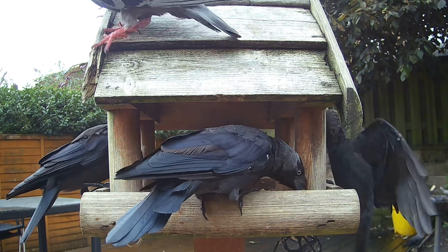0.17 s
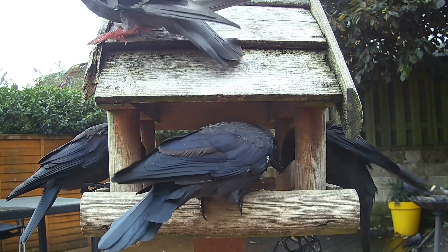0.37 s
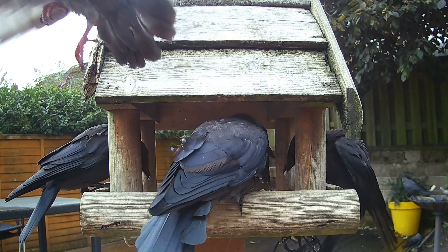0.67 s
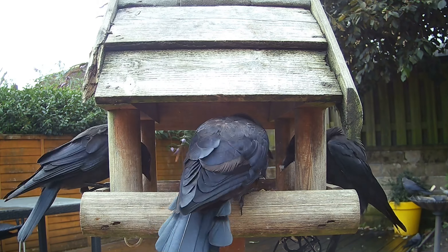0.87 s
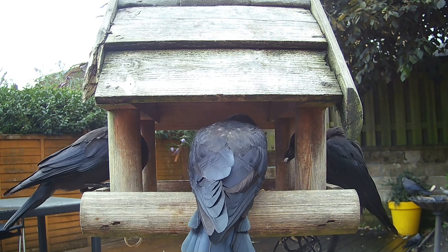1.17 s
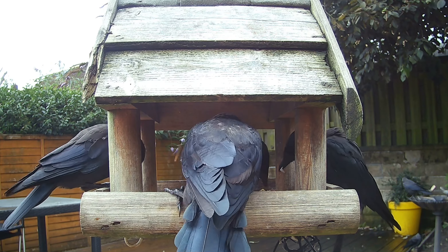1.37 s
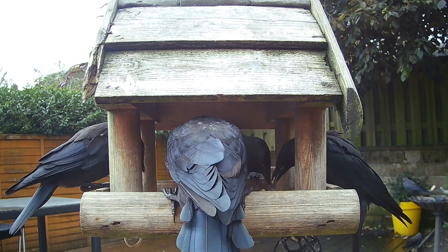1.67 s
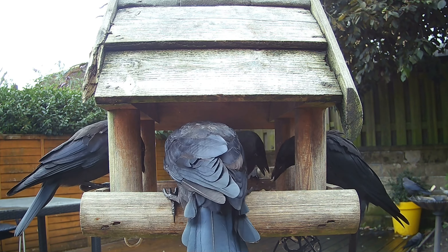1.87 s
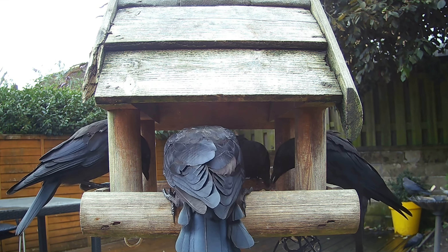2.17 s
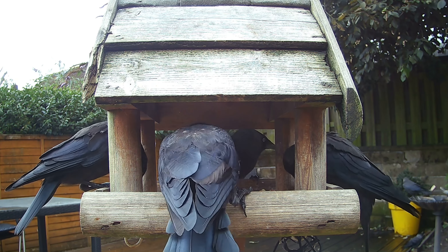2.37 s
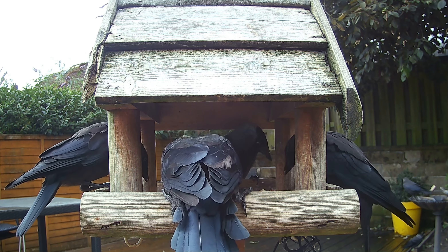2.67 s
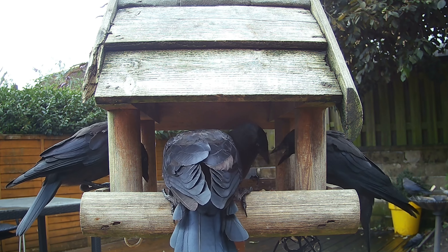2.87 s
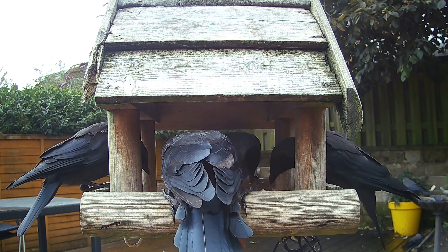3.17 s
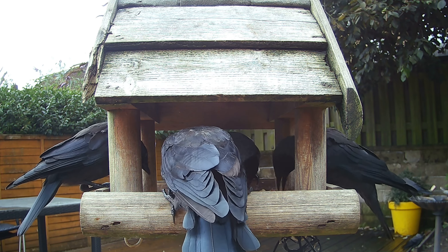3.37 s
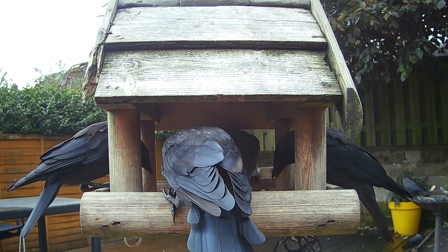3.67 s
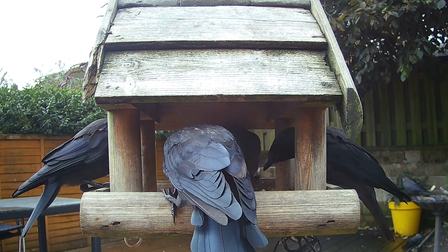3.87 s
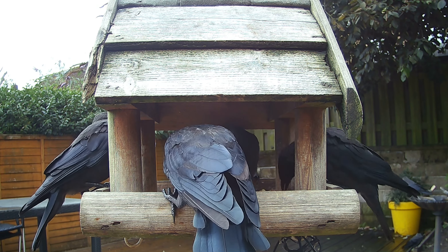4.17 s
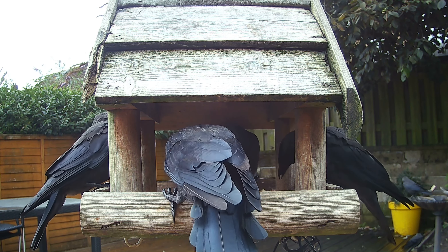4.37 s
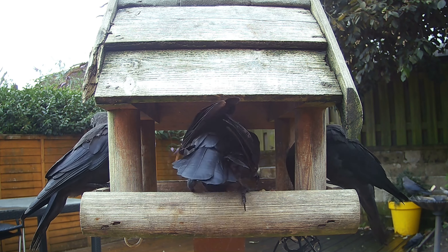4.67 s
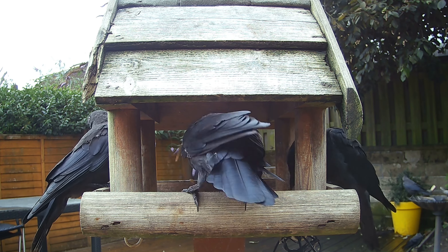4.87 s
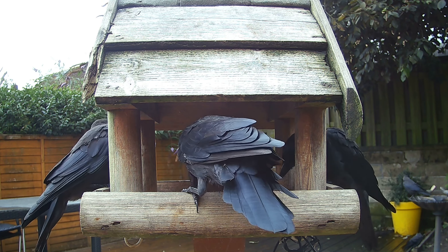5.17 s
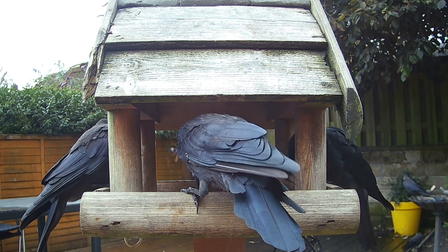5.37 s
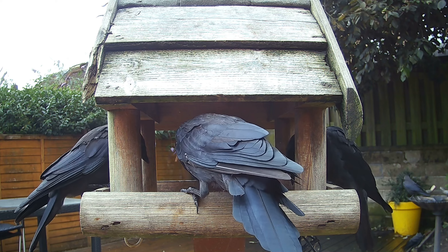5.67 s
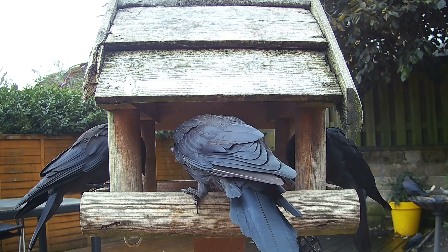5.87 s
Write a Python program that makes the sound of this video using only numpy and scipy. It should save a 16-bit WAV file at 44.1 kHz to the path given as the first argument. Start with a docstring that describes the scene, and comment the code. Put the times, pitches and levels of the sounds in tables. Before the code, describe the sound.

Several jackdaws feed at a wooden bird table in a fenced garden. First, claws and beaks tick on the wood and a brief flurry of wingbeats swishes and thuds, pushing air at the close microphone. Then comes a quick, uneven run of short, sharp calls, each falling in pitch, many of them hoarse, ringing slightly off the fences. Faint feather rustle, distant traffic and a low rumble lie underneath.

```python
"""Jackdaws give a quick run of short calls at a wooden bird table in a fenced garden.
Each call is a stack of tones from the bird's voice box, shaped by its throat: a clear note
that falls, turns hoarse and rings off the fences. Mostly before the calls, wings swish, thud
and push air, while claws and beaks tick on the wood. Behind it all, feathers rustle and
distant traffic drones over a low rumble."""
import sys
import numpy as np
from scipy import signal
from scipy.io import wavfile
from scipy.ndimage import uniform_filter1d

SR = 44100
rng = np.random.default_rng(int(sys.argv[2]) if len(sys.argv) > 2 else 0)


def unload_audio(sound):
    """Save the sound as a 16-bit wav file, at the path given as the first command line argument."""
    columns = np.transpose(np.atleast_2d(sound))
    # keep every value between -1 and 1, then stretch to whole-number steps
    steps = np.round(np.clip(columns, -1, 1) * 32767)
    wavfile.write(sys.argv[1], SR, steps.astype(np.int16))


N = 264688

# How loud the background is. Each row: time in seconds, then traffic, rumble and rustle levels in dB.
BACKGROUND_LEVELS = [(0, -46.5, -42.5, -80), (.5, -47, -43.5, -56), (1.2, -42, -38, -54),
                     (1.7, -42.5, -38.5, -54.5), (2.3, -41, -43, -54.5), (2.9, -36, -38.5, -57.5),
                     (4, -38.5, -37.5, -62), (5.001, -37, -36.5, -60), (5.5, -45.5, -42, -83),
                     (6, -55, -49.5, -58.5)]
# The tone colours of four noises. Each row: frequency in Hz, relative strength there in dB.
TRAFFIC_COLOUR = [(88, -6), (150, -1), (380, -3), (1240, -4.5), (2480, -19), (5260, -22), (10200, -34.5),
                  (15500, -67)]
RUMBLE_COLOUR = [(12, -33), (20, -12.5), (48, 3.5), (70, -7.5), (97, -0.5), (146, -10.5), (220, -10),
                 (440, -43.5)]
RUSTLE_COLOUR = [(1200, -20), (2200, -7), (6000, -9.5), (9300, -13), (15500, -29)]
SWISH_COLOUR = [(600, 7.5), (1000, 2), (4300, 8), (8500, -0.5), (15000, -31)]
# How long the fences ring. Each row: frequency in Hz, seconds to fade by 60 dB.
FENCE_FADES = [(1000, 0.41), (2200, 0.35), (5000, 0.47), (10000, 0.44)]
# Echoes from close by. Each row: delay in seconds, level in dB against the direct sound.
CLOSE_ECHOES = [(.0043, -16.5), (0.0104, -11.5), (.031, -17)]
# Air pushed at the microphone by wings. Each row: start in seconds, level in dB, frequency in Hz.
WING_GUSTS = [(0.637, -23, 25), (0.791, -26.5, 22), (.895, -25.5, 24.4), (1.0, -24, 24), (1.226, -25, 37.5),
              (5.435, -29, 44.2), (5.543, -30, 39), (5.943, -29, 39.5)]
# Claws and beaks on wood. Each row: start in seconds, level in dB, pitch in Hz.
WOOD_TICKS = [(.1077, -26, 4730), (.2595, -39, 6640), (.268, -37, 2900), (.3924, -39, 2600),
              (.4374, -33, 1400), (.5182, -41.5, 3220), (1.062, -26, 4940), (1.198, -28, 3900),
              (1.7, -33, 6600), (1.7544, -36.5, 6190), (2.0203, -29, 5430), (2.1558, -31, 6000),
              (2.1954, -31.5, 2760), (2.293, -35, 7400), (3.397, -26, 7160), (3.972, -38, 5870),
              (5.0434, -30, 6400)]
# Wing beats. Each row: time in seconds, swish level in dB, thud level in dB, thud pitch in Hz.
WING_BEATS = [(0.089, -41.5, -59, 520), (0.804, -46.5, -40, 517), (0.8708, -41.5, -34.5, 546),
              (0.924, -46, -34, 327), (0.995, -31.5, -31.5, 580), (1.052, -38, -38.5, 746),
              (1.129, -39.5, -37.5, 395), (1.1966, -58, -38, 444), (1.2526, -37, -30, 348),
              (1.314, -40, -38.5, 520), (1.3647, -35.5, -32.5, 285), (1.414, -38.5, -42, 520),
              (1.4799, -40, -32, 294), (1.6117, -40, -51, 520), (2.1286, -43.5, -44, 520),
              (3.855, -31, -61, 520)]
# The throat's main, high and top resonances (frequencies it favours). Each row: centre in Hz for
# a 1130 Hz note, width in Hz, level in dB, share of the call's brightness added to that level.
THROAT_RESONANCES = [(2265, 710, 3, 0.098), (5020, 1660, -9.5, 0.56), (8010, 3640, -21.5, 0.4)]
# The calls. Each row: start, hold time and fall time in seconds, start and end pitch in Hz, level in dB,
# hoarseness from 0 to 1, brightness in dB, boosts of the low and the third resonance in dB.
JACKDAW_CALLS = [ (2.484, 0.03, 0.052, 1109, 852, -24, 0.4, 1, 3, -2),
                 (2.595, 0.011, 0.024, 1070, 906, -29.5, 0.75, -16, 10.5, 6),
                 (2.757, 0.02, 0.051, 1150, 844.5, -17, 0.79, 2.5, 0, -11),
                 (2.797, 0.014, 0.035, 1226, 1118, -20.5, 0.65, 16.5, 13.5, 19),
                 (2.942, 0.032, 0.071, 1270, 813, -16, 0.68, 20.5, 12, 19.5),
                 (3.030, 0.019, 0.025, 1253, 1013, -15, 1, -4.5, -7, 0),
                 (3.197, 0.019, 0.091, 937, 899, -19.5, 0.69, 9.5, 6.5, 17),
                 (3.218, 0.023, 0.064, 1128, 981, -20, 0.64, -7, -6, 1),
                 (3.349, 0.043, 0.023, 1076, 929, -26.5, 0.23, -11, 11.5, -5),
                 (3.422, 0.0061, 0.012, 1006, 980, -29.5, 0.24, -27, -6, -15),
                 (3.490, 0.029, 0.043, 1266, 943, -11.5, 0.52, -2, -10, -11),
                 (3.694, 0.013, 0.048, 1214, 982, -25, 0.37, -9, 4.5, -22),
                 (3.780, 0.034, 0.05, 1174, 1001, -29, 0.51, -8, 5.5, -17),
                 (4.005, 0.03, 0.042, 1158, 1008, -15.5, 0.57, -7, -3, -26),
                 (4.151, 0.012, 0.051, 1280, 881, -18, 0.63, -21.5, -5.5, -17),
                 (4.27, 0.017, 0.049, 1139, 855, -18.5, 0.62, -1, 6.5, 1),
                 (4.304, 0.022, 0.053, 1367, 1105, -19.5, 1, 4, -3.5, 14),
                 (4.384, 0.021, 0.0246, 1174, 1020, -18.5, 0.086, -23, -3, -6),
                 (4.497, 0.026, 0.049, 1280, 815, -19, 0.7, 13.5, 15, 18),
                 (4.564, 0.014, 0.044, 1086, 781, -22, 0.91, 13, -7, 19),
                 (4.628, 0.022, 0.043, 1080, 1065, -14, 0.86, 14, 2.5, 29),
                 (4.734, 0.02, 0.034, 954, 806, -15.5, 0.95, -16, -11, -29),
                 (4.750, 0.032, 0.0436, 1139, 974, -19, 0.67, -14, 0.5, -10),
                 (5.064, 0.022, 0.042, 1321, 1045, -15.5, 0.4, -9.5, -5, 2),
                 (5.169, 0.015, 0.044, 1188, 980, -24, 0.34, -7, 2.5, 3),
                 (5.224, 0.035, 0.03, 1179, 879, -14, 0.34, -6.5, -7, -1), ]

# Two narrow throat resonances, below and above the main one, whose strength differs from call to call.
LOW_HZ, LOW_WIDTH_HZ, LOW_DB = 1257, 312, -7.5
THIRD_HZ, THIRD_WIDTH_HZ, THIRD_DB = 3190, 320, -17


def gain_of(db):
    """Turns decibels into a number to multiply a sound by."""
    return 10 ** (np.asarray(db) / 20)


def evened(x):
    """Scales a signal so that its average level (rms) is 1."""
    return x / np.sqrt(np.mean(x ** 2) + 1e-20)


def look_up(points, hz):
    """Reads between the rows of a (Hz, value) table, with octaves evenly spaced."""
    row_hz, value = np.transpose(points)
    return np.interp(np.log(hz + 1), np.log(row_hz + 1), value)


def add(mix, start_s, sound):
    """Mixes a sound in at the given time."""
    part = mix[round(start_s * SR):][:len(sound)]
    part += sound[:len(part)]


def resonate(x, hz, width_hz):
    """Lets through the part of a sound near one frequency."""
    pole = np.exp((2j * np.pi * hz - np.pi * width_hz) / SR)
    return 2 * signal.lfilter([1 - abs(pole)], [1, -pole], x).real


def drift(noise, samples):
    """Smooths noise into a random wander; more samples make it slower."""
    return evened(uniform_filter1d(noise, size=samples))


def hiss(colour, patchy_db=0., size=1024):
    """Noise of a given tone colour; patchy_db adds drifting louder and softer patches."""
    frames, hz = 4 * N // size + 5, np.fft.rfftfreq(size, 1 / SR)
    real, imag, patches = rng.standard_normal((frames, len(hz), 3)).T
    patches = drift(uniform_filter1d(patches, size=12, axis=0), 10)
    spectrum = (real + 1j * imag) * gain_of(look_up(colour, hz)[:, None] + patchy_db * patches)
    return evened(signal.istft(spectrum, nperseg=size, noverlap=size * 3 // 4)[1][:N])


def background():
    """Distant traffic, a low rumble and the flickering rustle of shifting birds."""
    times, *levels_db = np.transpose(BACKGROUND_LEVELS)
    traffic, rumble, rustle = (gain_of(np.interp(np.arange(N) / SR, times, db)) for db in levels_db)
    flicker = gain_of(3 * drift(rng.standard_normal(N), 500))
    return (traffic * hiss(TRAFFIC_COLOUR, patchy_db=1.46)
            + rumble * hiss(RUMBLE_COLOUR, size=4096)
            + rustle * flicker * hiss(RUSTLE_COLOUR, size=256))


def fence_echoes(x):
    """Sound bounces between the fences as many tiny echoes, each frequency fading at its own speed."""
    bounces = np.zeros(SR)
    slots = np.arange(300, SR - 20, 20)  # one echo somewhere in every 20 samples
    bounces[slots + rng.integers(0, 20, slots.shape)] = rng.choice([-1., 1.], slots.shape)
    hz, t, spectrum = signal.stft(bounces, SR, nperseg=256)
    fade = gain_of(-60 * t / look_up(FENCE_FADES, hz)[:, None])
    tail = signal.istft(spectrum * fade, SR, nperseg=256)[1]
    return signal.fftconvolve(x, tail / np.linalg.norm(tail))[:N]


def with_close_echoes(x):
    """The sound itself plus a few later, quieter reflections."""
    out = x.copy()
    for delay_s, db in CLOSE_ECHOES:
        add(out, delay_s, gain_of(db) * x)
    return out


def wing_gusts():
    """Each gust off a wing is one slow swing of air pressure."""
    out = np.zeros(N)
    for start_s, db, hz in WING_GUSTS:
        cycles = np.arange(0, 1.3, hz / SR)
        add(out, start_s, -gain_of(db) * np.sin(2 * np.pi * cycles) * np.sin(np.pi * cycles / 1.3))
    return out


def wood_ticks():
    """A claw or beak hits the wood with a click and a short scrape; 60 faint ticks fall at random."""
    out, t = np.zeros(N), np.arange(1500) / SR
    faint = [(N / SR * when, -54 + 9 * loud, 3000 + 5000 * high)
             for when, loud, high in rng.random((60, 3))]
    ticks = list(WOOD_TICKS) + faint
    noises = rng.standard_normal((len(ticks), len(t)))
    fades_s = rng.uniform(0.0027, 0.0085, len(ticks))
    for (start_s, db, hz), noise, fade_s in zip(ticks, noises, fades_s):
        click = np.sin(2 * np.pi * hz * t) * np.exp(-t / 0.0016) * (1 - np.exp(-t / 0.00026))
        scrape = resonate(resonate(noise, hz, 4500), hz, 4500)
        scrape *= (1 - np.exp(-t / 0.00033)) * np.exp(-t / fade_s)
        add(out, start_s, gain_of(db) * (0.5 * click + 0.95 * scrape))
    return out


def wing_beats(rise_s=0.011, thud_width_hz=230):
    """Each beat is a swish of feathers that catch unevenly, with a dull thud of its own pitch."""
    swish_level, thuds = np.zeros((2, N))
    rise = np.arange(0, .1, 1 / SR) / rise_s
    swell = (rise * np.exp(1 - rise)) ** 2
    noises = rng.standard_normal((len(WING_BEATS), len(swell)))
    for (time_s, swish_db, thud_db, thud_hz), air in zip(WING_BEATS, noises):
        start_s = time_s - .006
        add(swish_level, start_s, gain_of(swish_db) * swell)
        thud = swell * resonate(resonate(air, thud_hz, thud_width_hz), thud_hz, 2 * thud_width_hz)
        add(thuds, start_s, gain_of(thud_db) * evened(thud) * np.sqrt(np.mean(swell ** 2)))
    crackle = gain_of(3.5 * drift(rng.standard_normal(N), 60))
    return swish_level * evened(crackle * hiss(SWISH_COLOUR, size=256)) + thuds


def throat(pitch_hz, tone_hz, bright_db, low_db, third_db):
    """How strongly the bird's throat passes each tone: most near its resonances."""
    beak = (pitch_hz / 1130) ** 0.51  # the beak closes as the pitch drops, lowering the resonances
    resonances = list(THROAT_RESONANCES) + [(LOW_HZ, LOW_WIDTH_HZ, LOW_DB + low_db, 0),
                                            (THIRD_HZ, THIRD_WIDTH_HZ, THIRD_DB + third_db, 0)]
    return sum(gain_of(db + share * bright_db) / (1 + (2 * (tone_hz - beak * centre_hz) / width) ** 2)
               for centre_hz, width, db, share in resonances)


def raggedness(multiple, rough, noise):
    """Each tone of the voice wavers in strength and timing, more so when it is high or hoarse."""
    height = (multiple / 8) ** 2  # from 8 times the pitch upward, even a clear note is fully ragged
    ragged = np.clip(rough ** 1.44 * multiple ** .5 + height, 0, 1)
    waver = drift(uniform_filter1d(noise, size=100), 100)
    breath = 0.12 * np.tile(height, (2, 1)) * drift(noise, 25)
    real, imag = np.split(waver + breath, 2)
    return np.sqrt(1 - ragged ** 2) + ragged * (real + 1j * imag) / np.sqrt(2)


def jackdaw_call(hold_s, fall_s, start_hz, end_hz, level_db, hoarse, bright_db, low_db, third_db):
    """The voice box pulses to make a stack of tones, steady at first, then falling and rough."""
    end_s = hold_s + fall_s
    t = np.arange(0, end_s, 1 / SR)
    noise = rng.standard_normal((53, 6000))[:, :len(t)]
    breakup = np.clip((t - hold_s) / 0.011 + 1, 0.22, 1)  # hoarseness sets in as the hold ends
    rough = hoarse * breakup
    pitch_hz = start_hz + (end_hz - start_hz) * np.interp(t, [0, hold_s, end_s], [0, .23, 1])
    wobble = 0.168 * (1.05 - end_hz / start_hz) * rough * drift(noise[0], 200)
    cycles = np.cumsum(pitch_hz * (1 + wobble)) / SR

    multiple = np.arange(1, 27)[:, None] / 2  # the tones lie at 0.5, 1, 1.5, .. times the pitch
    tone_hz = multiple * pitch_hz
    strength = throat(pitch_hz, tone_hz, bright_db, low_db, third_db)
    # When hoarse, strong and weak pulses alternate, which brings in the halfway tones.
    strength *= np.where(multiple % 1 > 0, rough ** 2, 1)
    rise_s = 0.0019 * np.maximum(multiple - 2, .1)  # higher tones arrive later
    strength *= 1 - np.exp(-(t + .001) / rise_s)
    treble_cut_db = -3 * np.clip((tone_hz - 6500) / 1000, 0, 3)
    strength *= gain_of(treble_cut_db * (1 - breakup))  # the treble opens up with the rasp
    strength *= gain_of(2 * noise[:26, :1] * (multiple > 3))  # high tones differ from call to call
    tones = np.exp(2j * np.pi * multiple * cycles + 1j * multiple ** 2)
    voice = (strength * raggedness(multiple, rough, noise[1:]) * tones).real.sum(0)
    voice /= np.sqrt(uniform_filter1d(voice ** 2, size=600) + 1e-12)  # flatten the level before shaping

    # The level dips briefly, peaks during the hold and sinks through the fall.
    shape_s = [0, min(0.0071, .5 * hold_s), 0.58 * hold_s, hold_s + .5 * fall_s, end_s]
    shape_db = np.interp(t, shape_s, [-3, -5.5, 0, -3.5, -7])
    fade = np.clip(np.minimum(t / 0.003, (t[-1] - t) / 0.0083), 0, 1)
    return gain_of(level_db + shape_db) * voice * fade


def scene():
    """Mixes the birds, their echoes and the background into one channel."""
    calls = np.zeros(N)
    for start_s, *settings in JACKDAW_CALLS:
        add(calls, start_s, jackdaw_call(*settings))
    movement = wing_beats() + wood_ticks()
    echoes = gain_of(-6) * fence_echoes(calls + 0.66 * movement)
    return (with_close_echoes(calls) + movement + echoes + wing_gusts() + background())[None]


def record(dry):
    """The microphone softens the top octave, then a steep filter cuts the very highest sounds."""
    softened = signal.sosfilt(signal.butter(2, 9500., fs=SR, output="sos"), dry)
    steep_filter = signal.firwin(511, 15680, window=("kaiser", 9), fs=SR)
    return signal.oaconvolve(softened, steep_filter[None], "same")


dry = scene()
out = record(dry)
unload_audio(out)
```